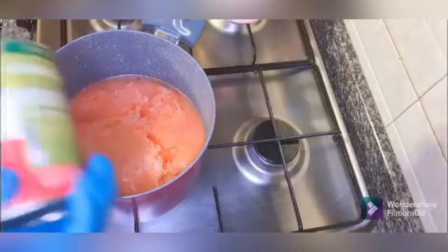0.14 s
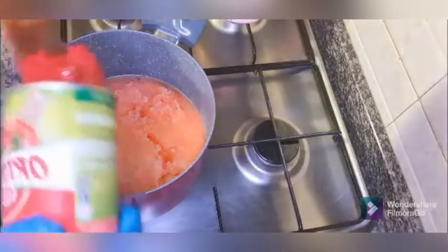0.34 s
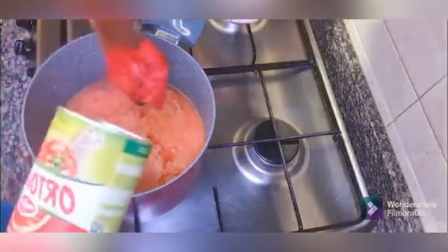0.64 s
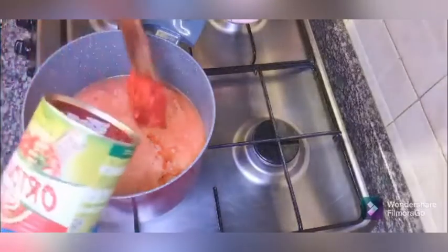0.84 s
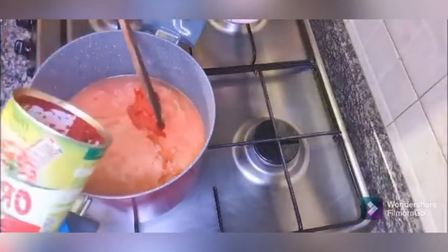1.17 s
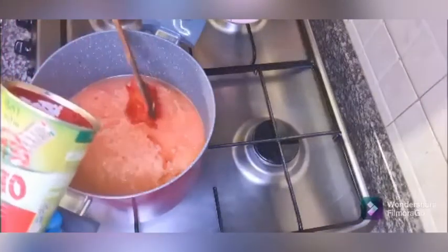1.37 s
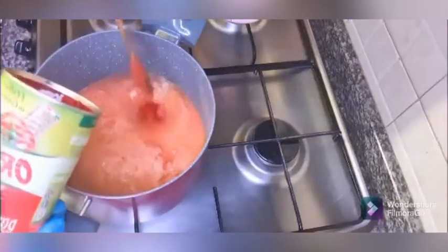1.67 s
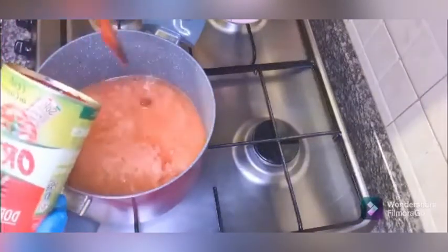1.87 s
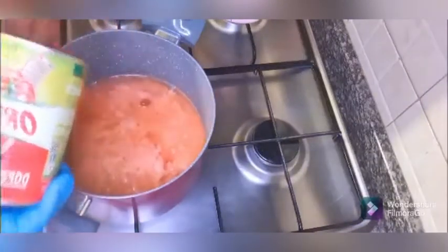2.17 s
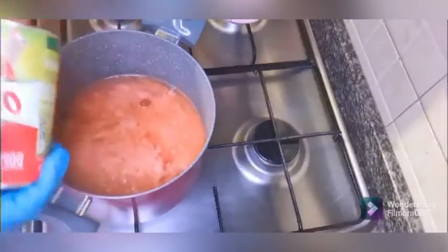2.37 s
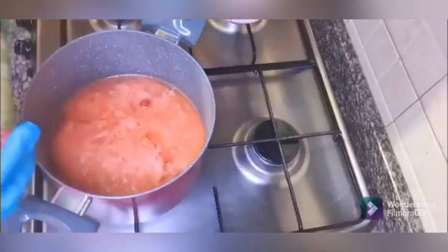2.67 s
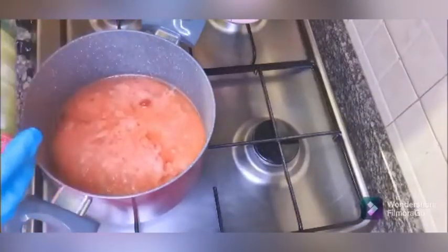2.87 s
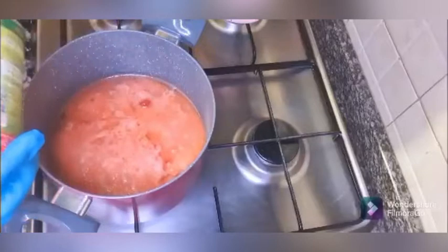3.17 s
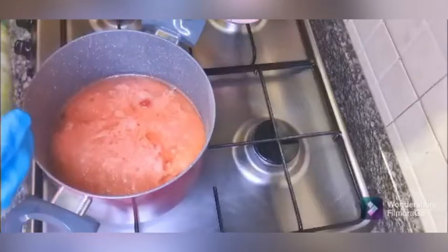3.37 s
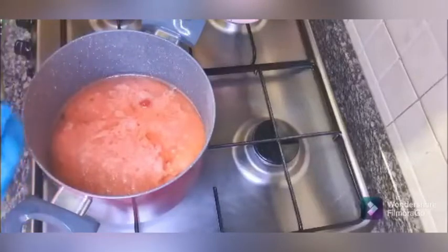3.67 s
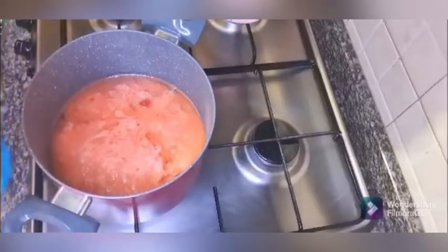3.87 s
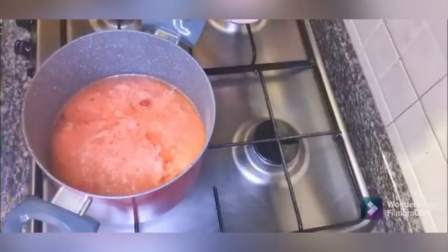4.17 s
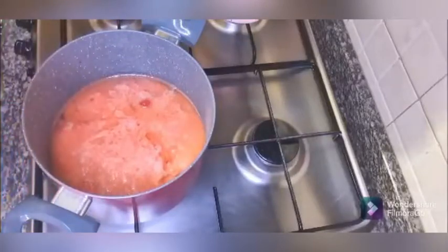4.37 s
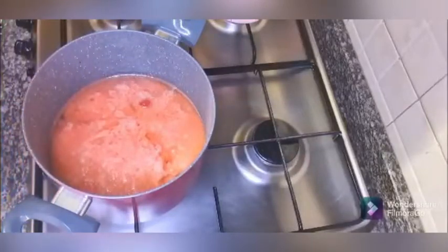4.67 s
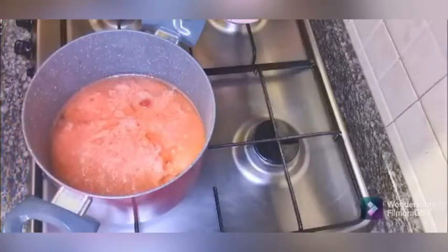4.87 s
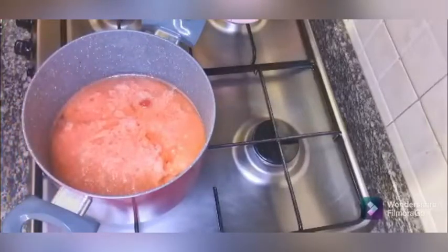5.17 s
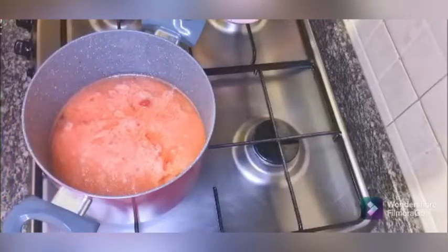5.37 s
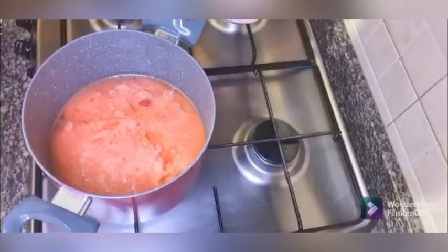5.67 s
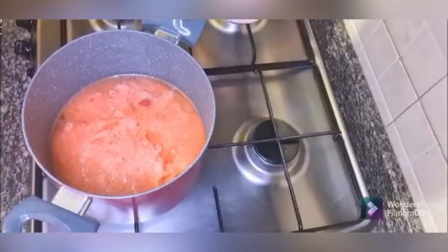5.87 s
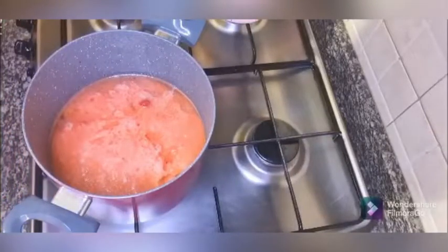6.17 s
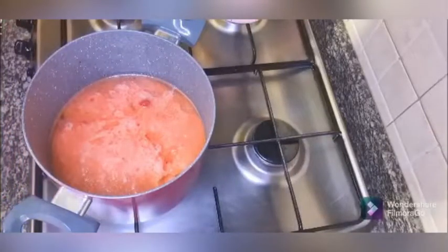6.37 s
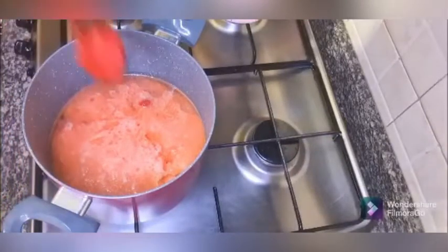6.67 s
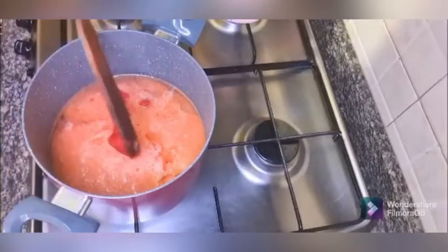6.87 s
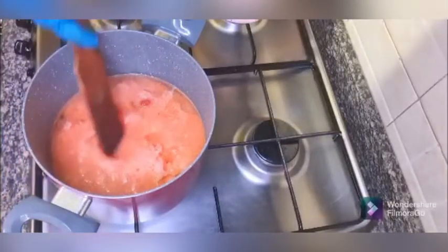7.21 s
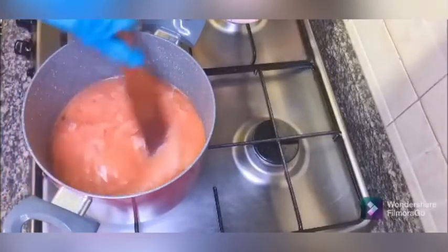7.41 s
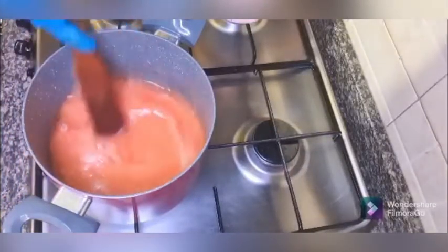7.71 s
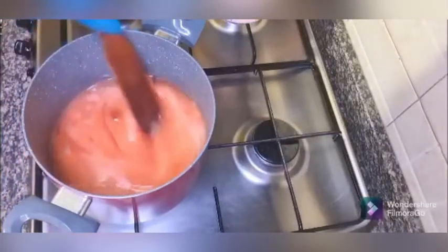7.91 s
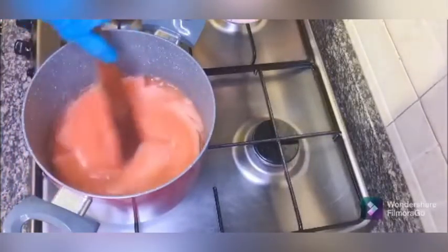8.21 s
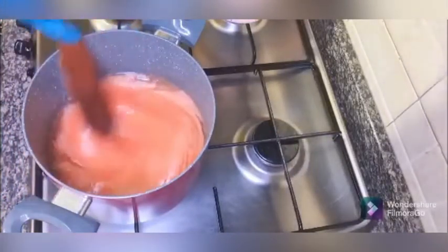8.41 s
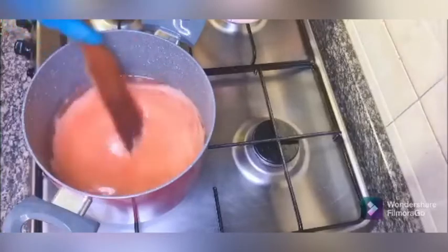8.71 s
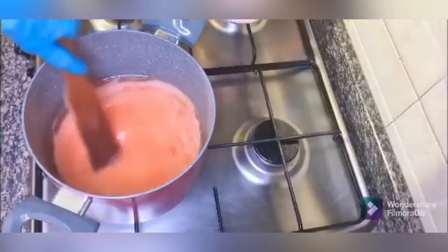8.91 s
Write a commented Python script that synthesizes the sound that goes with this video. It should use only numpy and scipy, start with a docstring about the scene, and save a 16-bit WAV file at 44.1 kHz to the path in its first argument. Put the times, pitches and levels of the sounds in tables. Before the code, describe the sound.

Over a quiet stove bed of rumble, gas rush and fine sizzle, thick sauce is thumped four times in quick rhythm and a lump plops in with a gurgling splash. Wood taps metal, then rattles in a tight burst of short, damped knocks. A calm stretch holds small round bubble pops. A dull pot knock starts faint scraping, gurgling stirs, closed by a hard knock. Close phone pickup, short tiled-room reflections.

```python
"""In a tiled kitchen, close to a phone, tomato sauce simmers in a pot on a gas stove.
A wooden spatula shakes a lump of paste into the pot in four swings, knocks about in the tin,
then knocks the pot and stirs in short pushes. Soft bubbles pop in clusters over a low rumble, the burner's
rush and a fine sizzle. Notes are decaying or gliding sines; wet, scraping and steady sounds are
filtered noise or random impulses."""
import sys
import numpy as np
from scipy import signal
from scipy.fft import rfft, irfft
from scipy.io import wavfile

SR = 44100
rng = np.random.default_rng(int(sys.argv[2]) if len(sys.argv) > 2 else 0)


def dump_mix(stems):
    """Bounce the given channels to the path in sys.argv[1] as a 16-bit WAV at rate SR."""
    frames = np.atleast_2d(stems).T  # one column per channel
    limited = np.clip(frames, -1, 1)  # hard clip at full scale
    pcm = np.round(limited * 32767).astype(np.int16)
    wavfile.write(sys.argv[1], SR, pcm)


N = 399105
TIME = np.arange(N) / SR
RING = TIME[:SR // 2]  # the half second given to each single sound
LEFT_RIGHT = np.array([[1], [-1]])  # opposite signs for the two channels

# Spatula knocks on tin and pot. Each row: start in seconds, level in dB, ring in Hz, ring t60 in seconds,
# then in dB below or above the ring the lower mode and the chatter, contact brightness in Hz, clack in Hz,
# clack and thud in dB, time until damped in seconds, left minus right in dB.
KNOCKS = [(1.7, -33, 603, 0.057, -6, -7, 2000, 2050, -20, -24, .015, 1),
          (2.263, -35, 666, .14, -18, -4, 4000, 2120, -19, -26, .06, 0),
          (2.475, -15, 688, 0.056, -3.5, -11.5, 1500, 2020, -26, -38, 0.022, -0.5),
          (2.883, -36, 706, .049, -15, -3, 4000, 1870, -18, -22, .02, 0),
          (2.990, -37.5, 687, 0.035, -1.5, -1.5, 2500, 1800, -19, 1, .02, 0),
          (3.176, -42.5, 685, .04, 1, -2, 2000, 1710, -12, -7, .02, 3),
          (3.982, -29, 705, 0.064, -18, -14, 1500, 1710, -27, -12, .03, 3),
          (4.051, -12, 690, 0.045, -0.5, -14, 3300, 2160, -19, -27, 0.016, 1),
          (4.190, -15.5, 716, .17, -0.5, -15.5, 2700, 1740, -14, -32, .033, 2),
          (4.244, -9, 683, 0.058, -12, -15, 4530, 1890, -23, -26, .011, -.5),
          (4.257, -16.5, 716, .06, -10, -16, 3000, 1980, -20, -31, .012, 1),
          (4.283, -17.5, 666, 0.036, -26, -15.5, 2800, 1980, -23, -14, .011, 0),
          (4.633, -22, 677, 0.087, -18, -8, 2870, 1175, -14, -21, 0.034, -1),
          (4.747, -38.5, 626, .025, -9, 4, 1800, 2000, -7, -18, .02, 1),
          (7.224, -11, 592, 0.045, -35, -12.5, 1090, 1025, -22, -30, .03, 0.5),
          (8.997, -29, 595, 0.13, -13, -10, 3000, 1830, -33, -26, 0.051, -2),
          (9.039, 2, 650, 0.035, -32, -19, 6500, 1800, -28, -36, .03, 4)]
# Sharp ticks of spatula and paste against the metal.
# Each row: start in seconds, level in dB, centre in Hz, metal ring in dB.
TICKS = [(1.122, -39, 5170, -9), (1.582, -41, 6500, -5), (1.614, -26.5, 5600, -2), (1.700, -42, 3300, -8),
         (1.708, -28, 6170, -12), (1.752, -31.5, 4970, -17), (4.245, -31, 3400, -11),
         (4.748, -34, 4270, -12), (7.075, -38.5, 7540, -10), (7.24, -36, 5200, -23),
         (8.996, -36.5, 3850, -9), (9.038, -15.5, 4800, -19)]
# Shakes of the loaded spatula. Each row: start in seconds, thump in dB, wet slap in dB.
SHAKES = [(1.019, -17.5, -41), (1.195, -17, -37.5), (1.37, -15, -34), (1.568, -20, -39.5)]
# Modes of the pot with its sauce, rung by every slap and by the falling lump.
# Each row: frequency in Hz, level in dB, t60 in seconds.
POT_MODES = [(68, -18, 0.46), (153, -7.5, 0.43), (271, -24, .25), (338, -7, 0.18), (420.5, -4, 0.14),
             (534.4, -6.5, .28), (564, -0.5, 0.091), (662, -1, .06), (740, -8.5, .13), (1095, -13.5, .1),
             (1315, -17, .055), (2000, -17.5, 0.048)]
# Modes of the thin metal that a tick rings, damped by the hand.
# Each row: frequency in Hz, level in dB, t60 in seconds.
TIN_MODES = [(2005, -0.5, 0.062), (2900, -17, .033), (3500, -6, .024), (3712, -13.5, 0.09),
             (5300, -9, 0.084), (5730, -15.5, 0.044), (7210, 0, 0.049), (11200, -14, .033)]
# Well-damped wall resonances of tin and pot. Each row: frequency in Hz, nominal width in Hz, level in dB.
WALL = [(310, 190, -0.5), (970, 156, 4), (1467, 150, -1), (1813, 480, 1.5), (2185, 99, -4.5),
        (2680, 230, -10.5), (3050, 130, -6), (3470, 100, -9), (4830, 450, -11)]
# Bright resonances of a tick. Each row: frequency in Hz, nominal width in Hz, level in dB.
TICK_RESONANCES = [(1890, 50, 21.5), (3070, 730, 3), (4900, 240, 1), (7480, 1020, 0.5), (11700, 1600, -0.5)]
# Resonances of a wet slap in the pot. Each row: frequency in Hz, nominal width in Hz, level in dB.
SLAP_RESONANCES = [(335, 46, 3), (402, 54, 4), (547, 48, 4), (714, 220, -9.5), (1050, 210, -18)]
# Wet churning as the sauce closes over the lump. Each row: frequency in Hz, nominal width in Hz, level in dB.
CHURN = [(337, 110, 10.5), (540, 86, 1), (780, 98, -3), (1150, 240, -8), (1950, 460, -12),
         (3300, 1600, -19)]
# Resonances of the dragged pot. Each row: frequency in Hz, nominal width in Hz, level in dB.
DRAGGED_POT = [(599, 33, 12.5), (638, 74, 12), (730, 110, -7), (850, 97, -11)]
# Pushes of the spatula through the sauce.
# Each row: start in seconds, length in seconds, level in dB, gurgle start in Hz, gurgle end in Hz.
STROKES = [(7.618, 0.068, -48.5, 594, 573), (7.699, 0.089, -50.5, 596, 629), (7.88, 0.081, -53.5, 703, 660),
           (8.066, 0.049, -53, 830, 727), (8.097, 0.096, -50, 630, 605), (8.279, 0.088, -47, 624, 654),
           (8.391, 0.065, -54, 668, 752), (8.656, 0.058, -58.5, 590, 640)]
# Wet smacks of sauce leaving the blade. Each row: start in seconds, level in dB, starting pitch in Hz.
SMACKS = [(7.64, -52, 1180), (8.128, -52, 1510), (8.66, -47, 1280), (8.893, -48.5, 1705), (8.9, -48, 1210)]
# Single clear bubbles bursting. Each row: start in seconds, level in dB, starting pitch in Hz.
BUBBLES = [(4.108, -42, 600), (4.790, -46.5, 700), (4.929, -46, 694), (5.657, -49, 560), (6.016, -48, 521),
           (6.048, -44.5, 531), (7.921, -43, 607)]
# Clusters of soft bubbles.
# Each row: start in seconds, length in seconds, level of a bubble in dB, middle pitch in Hz.
CLUSTERS = [(4.88, .08, -53.5, 687), (5.267, .22, -53.5, 704), (5.648, .1, -59, 697),
            (5.929, .13, -58, 603)]
# Colours of the low rumble, the burner's rush and the sizzle.
# Each row: frequency in Hz, relative level per Hz in dB.
RUMBLE = [(25, -32), (38, -25), (51, 8.5), (66, 0.5), (115, 0), (160, -3.5), (235, -12), (305, -5.5),
          (410, -15), (490, -13.5), (555, -6.5), (640, -18.5), (770, -16.5), (1100, -21.5)]
BURNER = [(780, -14), (950, -12.5), (1200, -8.5), (1490, 3), (1700, -10), (2100, -14), (2350, -15.5),
          (2700, -23), (3050, -21.5), (3450, -13.5), (3800, -17), (4250, -11), (5000, -20.5), (5500, -45)]
SIZZLE = [(4700, -25), (5200, -9), (5600, -16), (6150, -5), (6600, 0.5), (7050, -7.5), (7900, -12.5),
          (8450, -9), (9150, -26), (10400, -21.5), (11300, -14.5), (12500, -20.5), (13000, -7.5),
          (13300, -54)]
# Likeness of the two microphones in the steady sound.
# Each row: frequency in Hz, correlation from -1 (opposite) to 1 (alike).
LIKENESS = [(100, 0.97), (300, 0.87), (600, 0.76), (1000, 0.0032), (1500, 0.16), (2400, -0.19),
            (3100, -0.68), (4000, 0.016), (6600, -0.21), (13000, 0.066)]

# knocks: the pressing blade stops the ring; close modes of the undamped wall sing on faintly
DAMP_S = 0.0028
AFTER_DB, AFTER_T60_S, AFTER_RATIO, AFTER_WIDTH_HZ = -34.5, 0.3, 0.98, 63
# the clack swells and dies in a few cycles; a weaker mode lies just above it
CLACK_S, CLACK_UPPER_RATIO, CLACK_UPPER_DB = 0.00271, 1.216, -19
CRACK_DB = -0.5
TICK_OCTAVES = 0.75  # a tick favours the modes this near its centre
MODE_SCATTER_DB = 1.8  # how much each mode's strength varies from blow to blow
BUILD_CYCLES = 1.5  # a mode needs a few cycles to build, so the low ones come late

# the lump and the swinging sauce; pitch sags by the fraction THUMP_SAG
PLOP_S, PLOP_DB = 1.749, -16.5
THUMP_HZ, THUMP_T60_S, THUMP_SAG, SAG_S, THUMP_SWELL_S = 195.6, 0.069, 0.33, 0.052, 0.015
SHUDDER_DB = -24
SLAP_LEAD_S, SLAP_SWELL_S, SLAP_RING_DB, SLAP_NOISE_DB = 0.01, 0.0079, -1, -1
SPRAY_HZ, SPRAY_WIDTH_HZ, SPRAY_DB = 1700, 1000, -18  # fine spray of each slap
# the sauce swings back once after each shake, weaker and lower
REBOUND_S, REBOUND_DB, REBOUND_HZ, REBOUND_SLAP_DB = 0.056, -5.5, 161, -10.5
# after the lump lands the sauce heaves, each heave weaker, lower and longer than the last
HEAVE_COUNT, HEAVE_LAG_S, HEAVE_GAP_S = 3, 0.011, 0.053
HEAVE_DB, HEAVE_SLAP_DB, HEAVE_HZ, HEAVE_T60_S = -16.5, -30.5, 206.4, 0.088
HEAVE_STEP_DB, HEAVE_PITCH_RATIO, HEAVE_LENGTH_RATIO = -6.5, 0.94, 1.32
CHURN_DB, CHURN_T60_S = -29, 0.3
# droplets: thick and loud at first, then sparse and faint; each loses 60 dB in DROP_CYCLES cycles
DROP_COUNT, DROP_SPAN_S, DROP_LOW_HZ, DROP_HIGH_HZ, DROP_CYCLES = 90, 0.17, 973, 3620, 35
DROP_DB, DROP_DB_PER_S, DROP_SPREAD_DB = -33, -90, 14

# stirring: pushes over light dragging, with resonances that climb slowly
STROKE_ATTACK_S, STROKE_RELEASE_S = 0.023, 0.031
DRAG_START_S, DRAG_LENGTH_S, DRAG_DB, DRAG_DB_PER_S = 7.46, 1.6, -56.5, -3.8
STIR_MIDDLE_S, STIR_RISE_PER_S, SCRAPE_DB = 8.0, 0.05, -3.5
SQUELCH_HZ, SQUELCH_WIDTH_HZ, SQUELCH_DB = 740, 120, -12.5
WET_HZ, WET_WIDTH_HZ, WET_DB = 1800, 1400, -18.5  # fine wet crackle of each push
WASH_HZ, WASH_WIDTH_HZ, WASH_DB, WASH_PEAK_S, WASH_SPAN_S = 385, 110, -62.5, 8.38, 0.12
GURGLE_DB, GURGLE_WOBBLE, GURGLE_FLUTTER_DB = 1, 0.025, 1.5

CLUSTER_BUBBLES_PER_S, CLUSTER_PITCH_SPREAD, CLUSTER_SPREAD_DB = 43, 0.118, 2.5
TOP_HZ = 13300


def knocks():
    """Wood on metal: a hollow ring until the blade damps it, after-ring, dull thud, clack, and wall chatter."""
    out = np.zeros((2, N))
    port_phase = 0.38 * LEFT_RIGHT
    for (s, db, hz, t60, lower_db, wall_db, bright_hz,
         clack_hz, clack_db, thud_db, free_s, pan_db) in KNOCKS:
        hollow = fade(t60) * np.sin(2 * np.pi * hz * RING + port_phase)
        hollow += undb(lower_db) * fade(0.068) * np.sin(2 * np.pi * hz * 0.804 * RING)
        hollow *= swell(0.0035) * np.exp(-np.maximum(RING - free_s, 0) / DAMP_S)

        after = unit(resonate(noise(), [(hz * AFTER_RATIO, AFTER_WIDTH_HZ, 0)]))
        after *= undb(AFTER_DB) * fade(AFTER_T60_S) * swell(0.008)

        thud = np.sin(2 * np.pi * 270 * RING + port_phase) * fade(0.032) * swell(0.0019)

        # a duller contact leaves out the high resonances
        chatter = unit(resonate(noise(2), WALL))
        chatter = signal.lfilter(*signal.butter(3, min(bright_hz, SR / 3), fs=SR), chatter)
        chatter *= (fade(0.027) + undb(-13.5) * fade(0.16)) * swell(0.0028)

        knock = hollow + after + undb(thud_db) * thud
        knock += undb(clack_db) * clack(clack_hz) + undb(wall_db) * chatter
        add(out, s, knock * undb(db + pan_db / 2 * LEFT_RIGHT))
    return out


def clack(hz):
    """The brief, solid note of wood meeting the wall."""
    envelope = (RING / CLACK_S * np.exp(1 - RING / CLACK_S)) ** 2
    phase = 2 * np.pi * hz * (RING - CLACK_S) + 0.7 * LEFT_RIGHT
    return envelope * (np.sin(phase) + undb(CLACK_UPPER_DB) * np.sin(CLACK_UPPER_RATIO * phase))


def ticks():
    """Tiny bright cracks that swell over a millisecond or two and ring the thin metal."""
    out = np.zeros((2, N))
    for s, db, hz, ring_db in TICKS:
        crack = unit(band(resonate(noise(2), TICK_RESONANCES), hz, 0.25 * hz)) * fade(0.028)
        modes = []
        for mode_hz, level, t60 in TIN_MODES:
            octaves_away = np.log2(mode_hz / hz)
            level -= 10 * np.log10(1 + (octaves_away / TICK_OCTAVES) ** 2)
            modes.append((mode_hz, level, t60))
        tick = undb(CRACK_DB) * crack + undb(ring_db) * ring(modes, 0.0044)
        add(out, s, undb(db) * tick * swell(0.0023))
    return out


def ring(modes, scatter):
    """Damped modes, varied at every blow; phase differs more between the microphones for high ones."""
    out = 0
    for hz, db, t60 in modes:
        detune, strength, skew, start = rng.standard_normal(4)
        phase = start + skew * min(hz / 1500, 1) * LEFT_RIGHT
        envelope = fade(t60) * swell(BUILD_CYCLES / hz)
        note = np.sin(2 * np.pi * hz * (1 + scatter * detune) * RING + phase)
        out = out + undb(db + MODE_SCATTER_DB * strength) * envelope * note
    return out


def paste():
    """Each shake swings the sauce there and back; at last the lump plops in and the sauce heaves to rest."""
    out = np.zeros((2, N))
    for s, db, slap_db in SHAKES:
        out += slosh(s, db, slap_db, THUMP_HZ, THUMP_T60_S)
        out += slosh(s + REBOUND_S, db + REBOUND_DB, slap_db + REBOUND_SLAP_DB, REBOUND_HZ, THUMP_T60_S)
    plop = sum(heaving(ring([mode], 0.0017)) for mode in POT_MODES)
    add(out, PLOP_S, undb(PLOP_DB) * plop)
    for k in range(HEAVE_COUNT):
        s = PLOP_S + HEAVE_LAG_S + k * HEAVE_GAP_S
        hz, t60 = HEAVE_HZ * HEAVE_PITCH_RATIO ** k, HEAVE_T60_S * HEAVE_LENGTH_RATIO ** k
        out += undb(k * HEAVE_STEP_DB) * slosh(s, HEAVE_DB, HEAVE_SLAP_DB, hz, t60)
    return out


def slosh(s, db, slap_db, hz, t60):
    """One swing of the sauce: a wet slap, then a soft thump that sags in pitch, with a low shudder."""
    out = np.zeros((2, N))
    wobble = unit(band(noise(), 41, 71))
    pitch = hz * (1 - THUMP_SAG * swell(SAG_S) + 0.1 * wobble)
    thump = np.sin(2 * np.pi * np.cumsum(pitch) / SR) * fade(t60) * (1 - np.exp(-(RING / THUMP_SWELL_S) ** 2))
    shudder = unit(band(band(noise(), 110, 130), 110, 200)) * fade(0.26) * swell(0.012)
    add(out, s, undb(db) * (thump + undb(SHUDDER_DB) * shudder))

    splat = noise() + 0.5 * noise(2)  # partly shared by the two sides
    slap = undb(SLAP_NOISE_DB) * unit(resonate(splat, SLAP_RESONANCES)) * fade(0.21)
    slap += undb(SLAP_RING_DB) * ring(POT_MODES, 0.0098)
    spray = unit(resonate(noise(2), [(SPRAY_HZ, SPRAY_WIDTH_HZ, 0)]))
    slap += undb(SPRAY_DB) * spray * fade(0.15)
    slap *= 1 - np.exp(-(RING / SLAP_SWELL_S) ** 2)
    add(out, s - SLAP_LEAD_S, undb(slap_db) * slap)
    return out


def heaving(x, bend=0.03, flutter_db=4.0, rate_hz=28):
    """Moving sauce loads the pot unevenly: pitch bends and level flutters, more so after the attack."""
    pitch, size = (unit(band(band(noise(), rate_hz, 1.5 * rate_hz), rate_hz, 2 * rate_hz)) for _ in range(2))
    onset = 1 - fade(0.22)
    bent_time = np.cumsum(1 + bend * onset * pitch) / SR
    bent = np.array([np.interp(bent_time, RING, side) for side in x])
    return bent * undb(flutter_db * onset * (np.clip(size, -2, 2) - 0.5))


def splash():
    """Droplets thrown up by the lump patter back into the sauce, each a tiny pop of its own pitch."""
    out = np.zeros((2, N))
    for when, pitch, size, side in rng.random((DROP_COUNT, 4)):
        delay = DROP_SPAN_S * when ** 2
        hz = DROP_LOW_HZ * (DROP_HIGH_HZ / DROP_LOW_HZ) ** pitch
        pop = np.sin(2 * np.pi * hz * RING + 3 * (side - 0.5) * LEFT_RIGHT)
        pop *= fade(DROP_CYCLES / hz) * swell(1 / hz)
        level = undb(DROP_DB + DROP_DB_PER_S * delay - DROP_SPREAD_DB * size)
        add(out, PLOP_S + delay, level * pop * np.sqrt(DROP_LOW_HZ / hz))  # high drops are fainter
    return out


def churn():
    """The sauce closes over the lump with a rough, wet gurgle of resonated random impulses."""
    out = np.zeros((2, N))
    tearing = grains(900, 2.6) + 0.5 * np.array([grains(900, 2.6) for _ in range(2)])
    body = unit(resonate(tearing, CHURN))[:, :len(RING)]
    add(out, PLOP_S, undb(CHURN_DB) * body * fade(CHURN_T60_S) * swell(0.0071))
    return out


def stirring():
    """The spatula sticks and slips on the pot floor; slips ring the pot and pushes make the sauce squelch."""
    slips = grains(700, 2.2) + 0.6 * np.array([grains(650, 1.0) for _ in range(2)])
    body = unit(resonate(slips, DRAGGED_POT)) + undb(-15.5) * unit(band(slips, 1400, 1500))
    # sauce sloshing round the pot bends the resonances a little
    bend = 0.0253 * unit(band(band(rng.standard_normal(N), 3.0, 4.1), 2.93, 5.2))
    bent_time = np.cumsum(1 + bend + STIR_RISE_PER_S * (TIME - STIR_MIDDLE_S)) / SR
    body = np.array([np.interp(bent_time, TIME, side) for side in body])

    squelch = unit(resonate(grains(1500, 1.5), [(SQUELCH_HZ, SQUELCH_WIDTH_HZ, 0)]))
    wet = np.array([resonate(grains(600, 2.0), [(WET_HZ, WET_WIDTH_HZ, 0)]) for _ in range(2)])
    drag = push(DRAG_START_S, DRAG_LENGTH_S) * undb(DRAG_DB + DRAG_DB_PER_S * (TIME - DRAG_START_S))
    effort = sum(undb(db) * push(start, length) for start, length, db, _, _ in STROKES)

    scrape = body * np.hypot(drag, undb(SCRAPE_DB) * effort)
    sauce = (undb(SQUELCH_DB) * squelch + undb(WET_DB) * unit(wet)) * effort
    return (wash() + scrape + sauce) * undb(LEFT_RIGHT)  # left 2 dB above right


def wash():
    """The mass of sauce washes round the pot in a low, broad swell of resonated noise."""
    water = unit(resonate(rng.standard_normal(N), [(WASH_HZ, WASH_WIDTH_HZ, 0)]))
    return undb(WASH_DB) * water / (1 + ((TIME - WASH_PEAK_S) / WASH_SPAN_S) ** 2)


def push(start, length):
    """Envelope of one move of the spatula: a short rise, a hold, a quick dying away."""
    rise = np.clip((TIME - start) / STROKE_ATTACK_S, 0, 1)
    return rise * np.exp(-np.maximum(TIME - start - length, 0) / STROKE_RELEASE_S)


def gurgles():
    """Each push opens an air pocket behind the blade; its note glides and flutters as the sauce closes in."""
    out = 0
    wobble, flutter = (unit(band(band(rng.standard_normal(N), 23.0, 40), 24, 60)) for _ in range(2))
    for start, length, db, from_hz, to_hz in STROKES:
        glide = np.interp(TIME, [start, start + length + STROKE_RELEASE_S], [from_hz, to_hz])
        hz = glide * (1 + GURGLE_WOBBLE * wobble)
        out = out + undb(db) * push(start, length) * np.sin(2 * np.pi * np.cumsum(hz) / SR)
    return out * undb(GURGLE_DB + GURGLE_FLUTTER_DB * flutter + LEFT_RIGHT)


def smacks():
    """Sauce peels off the blade with small, wet, rising smacks."""
    out = np.zeros((2, N))
    for s, db, hz in SMACKS:
        note = np.sin(2 * np.pi * hz * (RING + 1.2 * RING ** 2) + 0.6 * LEFT_RIGHT)
        spray = unit(band(noise(2), 2000, 1600))
        add(out, s, undb(db) * (note + undb(-3.5) * spray) * fade(0.075) * swell(0.0022))
    return out


def bubbles(count=40):
    """Bubbles burst through the thick sauce, a few clear ones among soft clusters; tiny ones crackle."""
    out = np.zeros((2, N))
    for s, db, hz in BUBBLES:
        add(out, s, undb(db) * bubble(hz))
    for start, length, db, hz in CLUSTERS:
        for k, (early, pitch, size, side) in enumerate(rng.uniform(-0.995, 1, (count, 4))):
            delay = (k + early / 2) / CLUSTER_BUBBLES_PER_S
            if delay < length:
                pop = bubble(hz * (1 + CLUSTER_PITCH_SPREAD * pitch))
                pop = undb(db + CLUSTER_SPREAD_DB * size) * pop
                add(out, start + delay, pop * (1 + 0.5 * side * LEFT_RIGHT))
    crackle = np.array([band(grains(22, 0.97), 2300, 2250) for _ in range(2)])
    return out + undb(-72.5) * unit(crackle)


def bubble(hz):
    """A short round note that rises a little as the bubble opens."""
    return np.sin(2 * np.pi * hz * (RING + 0.3 * RING ** 2)) * fade(0.18) * swell(0.0012)


def stove():
    """The steady bed: a low rumble, the burner's rush and the fine sizzle."""
    return steady(RUMBLE, -55.0, 1.2) + steady(BURNER, -56, 1.0) + steady(SIZZLE, -59.5, 0.23)


def steady(spectrum, db, flicker_db):
    """Noise of the given colour that flickers slightly; its bass is alike on both sides."""
    log_hz = np.log(np.arange(N // 2 + 1) * SR / N + 1)
    colour, alike = (np.interp(log_hz, np.log(np.array(t)[:, 0]), np.array(t)[:, 1])
                     for t in (spectrum, LIKENESS))
    # beyond its ends the colour falls steeply
    below = np.maximum(np.log(spectrum[0][0]) - log_hz, 0)
    above = np.maximum(log_hz - np.log(spectrum[-1][0]), 0)
    gain = undb(colour - 60 * (below + above))
    alike = np.clip(alike, -1, 1)
    mid, side = (irfft(rfft(rng.standard_normal(N)) * gain * np.sqrt(1 + sign * alike), N)
                 for sign in (1, -1))
    flicker = np.interp(TIME, np.linspace(0, N / SR, num=120), rng.standard_normal(size=120))
    return unit(np.array([mid + side, mid - side])) * undb(db + flicker_db * flicker)


def kitchen(x, t60=0.38, room_db=-16, echo_s=0.0062, echo_db=-11):
    """One quick echo off the tiles and a short diffuse tail of decaying noise."""
    tail = band(noise(2), 670, 8200) * fade(t60) * swell(0.0023)
    tail /= np.sqrt(np.sum(tail ** 2, axis=1, keepdims=True))
    echo = np.array([np.interp(TIME - echo_s, TIME, c, left=0) for c in x])
    return x + undb(echo_db) * echo + undb(room_db) * signal.fftconvolve(x, tail, axes=1)[:, :N]


def undb(db):
    """Decibels to gain."""
    return 10 ** (np.asarray(db) / 20)


def unit(x):
    """Scale to rms 1."""
    return x / np.sqrt(np.mean(x ** 2))


def noise(channels=None):
    """White noise as long as RING, in one or more channels."""
    return rng.standard_normal(len(RING) if channels is None else (channels, len(RING)))


def fade(t60):
    """Exponential decay that loses 60 dB in t60 seconds."""
    return np.exp(-np.log(1000) * RING / t60)


def swell(seconds):
    """Exponential rise towards 1 with this time constant."""
    return 1 - np.exp(-RING / seconds)


def band(x, hz, width):
    """Two-pole resonance, gain 1 at its centre."""
    centre = min(hz, SR / 3)
    return signal.lfilter(*signal.iirpeak(centre, hz / min(width, SR / 4), fs=SR), x)


def resonate(x, modes):
    """A bank of steep resonances, each a narrow band followed by a wide one."""
    return sum(undb(db) * band(band(x, hz, 1.11 * width), hz, 4 * width) for hz, width, db in modes)


def grains(rate, spread_db):
    """Random impulses, on average `rate` per second, mostly small, a few large."""
    struck = rng.random(N) < rate / SR
    size = undb(spread_db * np.minimum(rng.exponential(size=N), 4))
    return struck * rng.choice([-1, 1], N) * size


def add(out, s, sound):
    """Mix a sound in from time s."""
    i = int(s * SR)
    out[:, i:i + sound.shape[-1]] += sound[..., :max(N - i, 0)]


def scene():
    """Spatula and sauce in the kitchen, over the steady stove."""
    spatula = knocks() + ticks() + stirring() + gurgles() + smacks()
    sauce = paste() + splash() + churn() + bubbles()
    return kitchen(spatula + sauce) + stove()


def record(dry):
    """The phone cuts the top: a steep low-pass."""
    return signal.sosfilt(signal.ellip(10, 0.2, 70, TOP_HZ, fs=SR, output="sos"), dry)


dry = scene()
out = record(dry)
dump_mix(out)
```